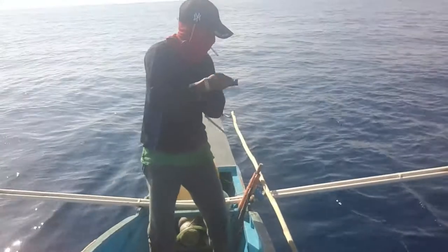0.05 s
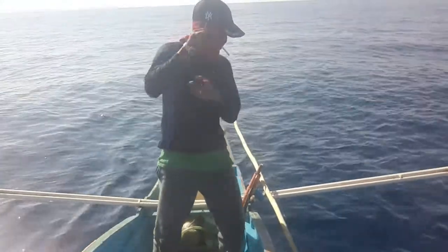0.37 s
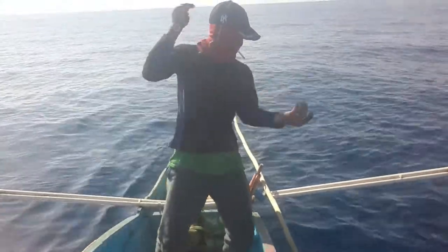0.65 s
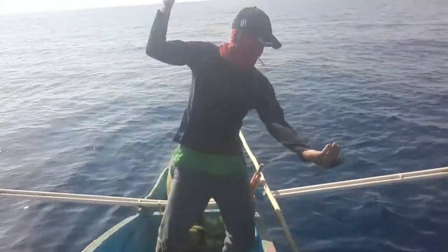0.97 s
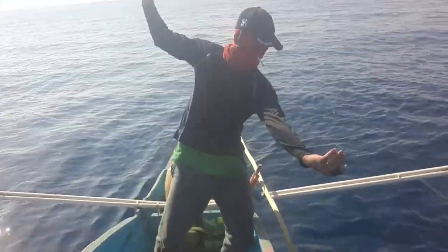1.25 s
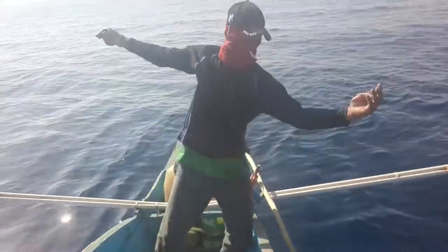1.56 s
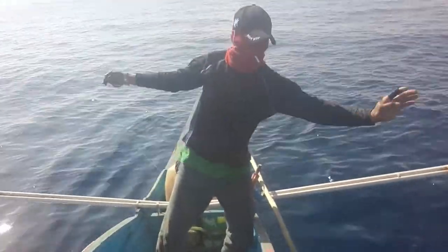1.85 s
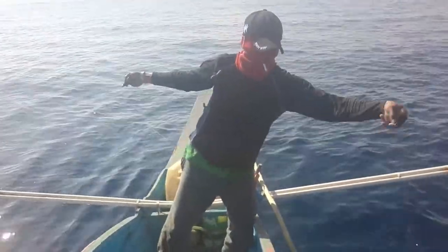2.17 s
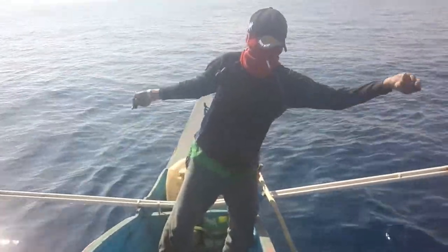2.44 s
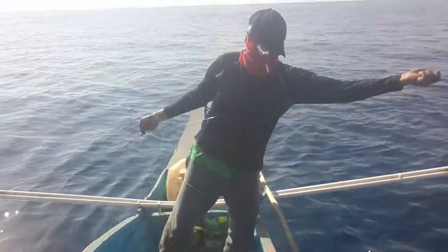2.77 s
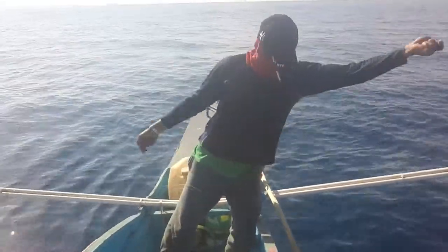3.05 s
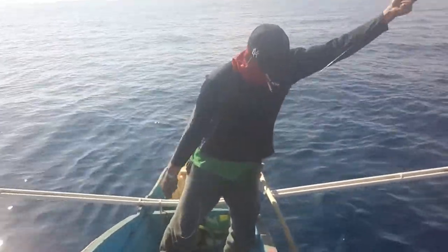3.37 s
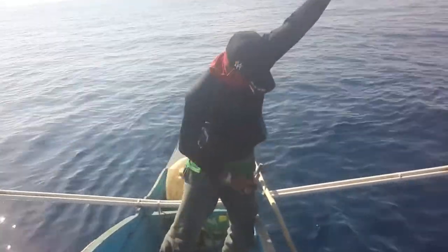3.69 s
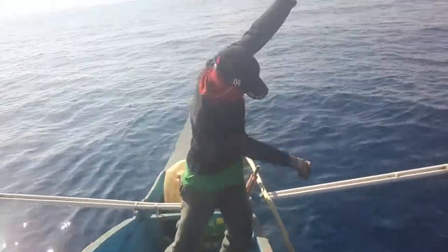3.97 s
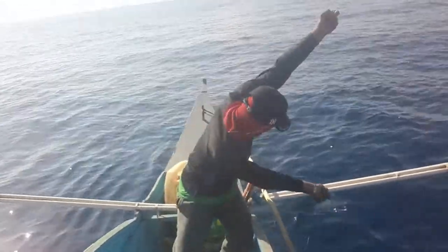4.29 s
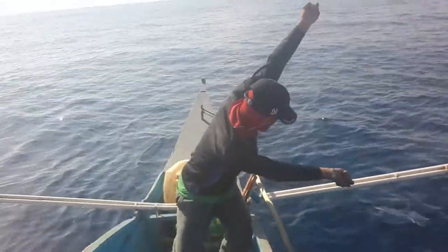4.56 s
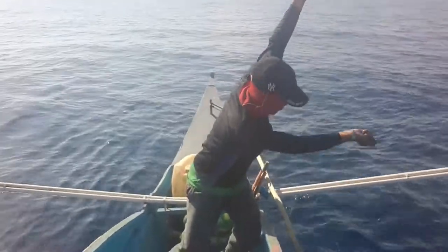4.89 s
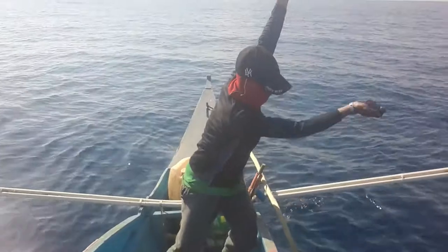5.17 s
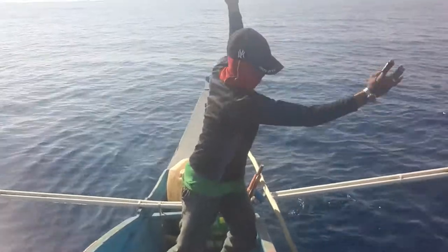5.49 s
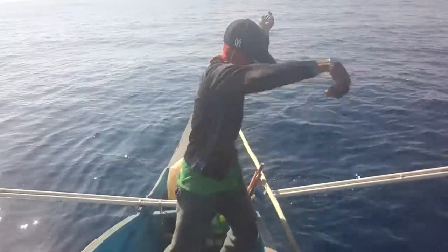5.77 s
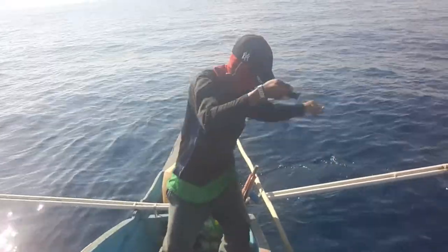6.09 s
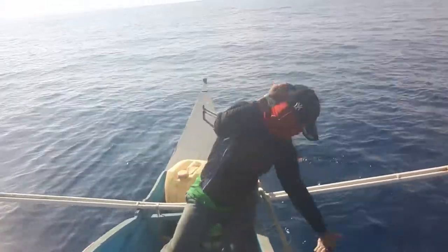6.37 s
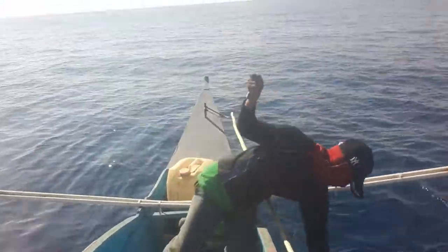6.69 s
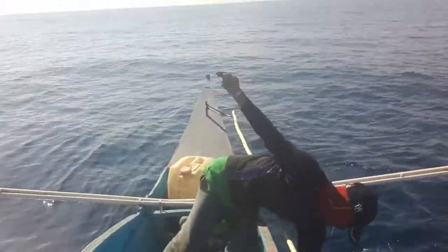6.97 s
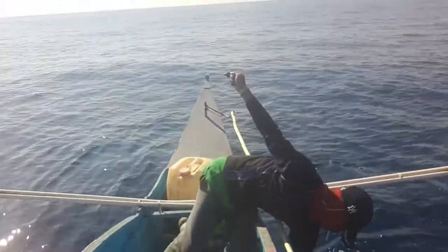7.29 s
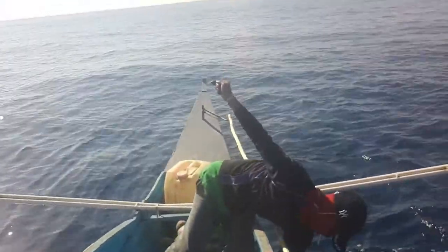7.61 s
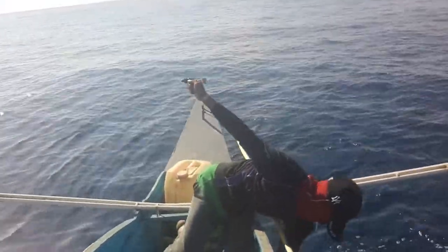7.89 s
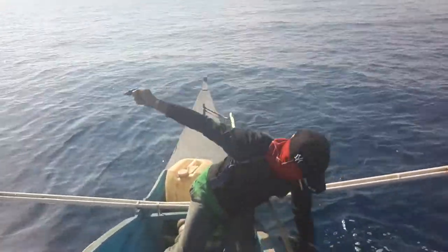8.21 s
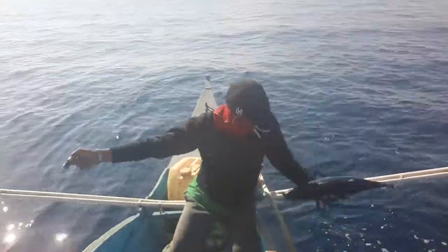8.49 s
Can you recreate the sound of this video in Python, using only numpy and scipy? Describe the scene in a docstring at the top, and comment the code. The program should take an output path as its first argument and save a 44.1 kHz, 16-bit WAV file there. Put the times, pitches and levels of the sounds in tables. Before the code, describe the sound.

Quiet water laps around a small outrigger boat while the hollow hull knocks dully under a fisherman's shifting weight. A fishing line faintly ticks and rasps through his hands, and a joint creaks in jerks. Past the middle, the water splashes and gurgles loudly as the catch comes up, followed by heavy thumps on the boards, more creaks and a last short splash. The microphone is close, mounted on the hull.

```python
"""The hollow hull of a small outrigger knocks, booms and creaks as a fisherman hauls a handline. His shifting
weight rings hull and floor boards; loaded joints slip in jerks; waves thump the planks. The line ticks through
his hands. Over a calm sea, water laps, then splashes and gurgles as the catch comes up: ringing bubbles, churn
and spray. Water, line and the grit of rasping joints reach a hull-mounted microphone through two air ports, the
rest of the boat's sounds through the mount."""
import sys
import numpy as np
from scipy import signal
from scipy.fft import rfft, irfft, next_fast_len
from scipy.io import wavfile
from scipy.ndimage import uniform_filter1d, minimum_filter1d, map_coordinates

SR = 44100
rng = np.random.default_rng(int(sys.argv[2]) if len(sys.argv) > 2 else 0)


def transcribe(signal):
    """Save signal, clipped to [-1, 1], as a 16-bit WAV file at the path in sys.argv[1]."""
    frames = np.atleast_2d(signal).T
    limited = np.clip(frames, -1, 1)
    pcm = np.round(limited * 32767).astype(np.int16)
    wavfile.write(sys.argv[1], SR, pcm)


N = 381112

# Spectral outlines: f/Hz, relative density/dB
SEA_SPECTRUM = [(35, -35.5), (62, -8.5), (115, 10.5), (180, -5), (380, -13), (900, -11.5), (2500, -54),
                (15000, -54.5)]
FRICTION_SPECTRUM = [(80, -21), (700, 15), (2300, -3.5), (3500, -8.5), (6500, -15), (9000, -25),
                     (15000, -40.5)]
TICK_SPECTRUM = [(300, -19), (1000, 16), (1900, -2.5), (2900, 3.5), (4500, -4.5), (7000, -6.5),
                 (11000, -34.5), (15000, -26.5)]
SPLASH_SPECTRUM = [(150, -22.5), (500, 1), (800, 7.5), (1500, 1), (3200, -19.5), (5000, -45.5),
                   (15000, -49.5)]
SPRAY_SPECTRUM = [(800, -7), (2400, -4), (4300, -6.5), (6700, -8.5), (8300, -27.5), (15000, -31.5)]
CLACK_SPECTRUM = [(150, -12), (550, 5.5), (1400, -4.5), (2300, -15.5), (6000, -72)]
THUMP_SPECTRUM = [(60, -21), (190, 0.5), (310, 6.5), (490, 3), (780, -25.5), (4000, -82)]
# Hull and floor board modes: f/Hz, level/dB, t60/s
HULL_MODES = [(124.4, -20, 0.18), (199, -11.5, 0.048), (312.5, -2, 0.27), (342.7, 12.5, 0.1),
              (384.2, -0.5, 0.18), (487.6, -7.5, 0.1)]
BOARD_MODES = [(70.6, -3.5, 0.48), (95.5, -1, 0.24), (116.6, -5.5, 0.37), (182, -8, 0.25)]
# Joint resonances: f/Hz, level/dB, left minus right/dB
JOINT_MODES = [(810, 1, 0), (1397, 14, -14), (2220, 9.5, -17), (3690, -7, 7), (5030, -5.5, 22)]
# Microphone ports: f/Hz, left gain/dB, right gain/dB, left phase lead/rad
PORT_RESPONSE = [(101, 0.5, 1.5, 0), (380, 6, 12.5, -0.5), (530, -1.5, 0.5, -0.5), (920, 0.5, 0.5, 0.94),
                 (1120, 1, 4.5, -1.5), (1904, 1, 9, -1.5), (2430, 14, 11, 2), (3230, 7, 1, 5.5),
                 (3944, 12.5, -16, -1.5), (4280, -2.5, -3.5, 0.5), (6520, 9.5, -12.5, 3.5),
                 (8600, -9.5, 9, 10), (14000, 5, -9.5, 6.5)]

# Event levels are relative within each table.
# Arm sweeps: middle t/s, length/s, level/dB, centre f/Hz
ARM_SWEEPS = [(0.79, 0.81, -61.5, 1800)]
# Gritty rasps of loaded joints sticking and slipping: middle t/s, length/s, level/dB
CREAK_RASPS = [(0.165, 0.17, -44), (1.188, 0.06, -40.5), (3.8, 0.079, -40), (4.01, 0.4, -42),
               (4.785, 0.091, -35), (7.54, 0.22, -37.5), (8.21, 0.21, -38)]
# Line ticks and spits of spray: t/s, level/dB
SNAPS = [(0.169, -36.5), (1.15, -44.5), (1.164, -32), (1.2284, -38), (2.3556, -43), (2.424, -38),
         (2.4786, -42), (4.005, -28), (4.7617, -27.5), (5.699, -18), (5.903, -24.5), (5.9434, -26),
         (5.971, -24), (7.4832, -30), (7.5707, -32.5)]
# Surges, from laps to the thrashing catch; the row at 3.8 s is a soft scuffing swell under the creaks: start
# t/s, rise/s, length/s, level/dB
WATER_SURGES = [(0, 0.02, 0.97, -48), (1.15, 0.025, 0.54, -45.5), (2.2, 0.03, 0.76, -49),
                (3.8, 0.024, 0.66, -45.5), (4.63, 0.017, 0.66, -42), (5.23, 0.16, 0.28, -28),
                (5.53, .06, .15, -28), (5.64, 0.04, 0.47, -25), (6.22, 0.0077, 0.26, -26.5),
                (6.55, 0.09, .28, -33.5), (7.35, 0.11, 0.46, -32.5), (8.21, .045, 0.12, -28),
                (8.4, 0.12, 0.26, -42)]
# Spray thrown by the catch: middle t/s, length/s, level/dB
SPRAY_SHEETS = [(5.41, 0.09, -41), (5.96, 0.06, -33.5), (8.295, 0.16, -37)]
# Gliding air pockets: start t/s, length/s, level/dB, start f/Hz, end f/Hz
POCKET_GULPS = [(1.586, 0.035, -35, 862, 920), (5.361, .11, -24, 1450, 471.7)]
# Water slaps: t/s, level/dB, bubble f/Hz
WATER_PLOPS = [(2.21, -22, 1067), (2.623, -24, 712), (5.381, -17.5, 1380), (5.419, -6.5, 664),
               (5.495, -17, 710), (5.68, -9.5, 990), (5.728, -16, 1600), (5.809, -11, 690),
               (5.902, -13, 610), (5.951, -5.5, 832), (6.173, -19, 1560), (6.224, -13, 923),
               (6.345, -7, 900), (6.423, -11, 1006), (6.587, -20, 1060), (6.641, -21.5, 1960),
               (6.685, -19.5, 1034), (6.816, -14.5, 1904), (6.935, -20.5, 1386), (7.367, -18.5, 702),
               (7.671, -13, 746), (7.962, -22, 1570), (8.257, -17, 1020), (8.465, -24.5, 800),
               (8.504, -24, 863)]
# Weight shifts loading the hull: start t/s, length/s, level/dB
WEIGHT_SHIFTS = [(0.404, 1.31, -41), (2.195, 0.66, -40), (2.641, 0.073, -28.5), (3.85, 0.42, -32),
                 (4.64, 0.3, -28), (5.664, 0.46, -29), (6.283, 0.25, -24), (6.604, 0.15, -31),
                 (7.502, 0.34, -28.5), (8.18, 0.16, -31.5)]
# Joint slips: t/s, level/dB
JOINT_SLIPS = [(1.3742, -28.5), (1.4257, -24), (2.842, -33.5), (2.868, -37.5), (2.889, -33), (3.837, -20.5),
               (3.876, -24), (3.9101, -22.5), (3.954, -22.5), (4.0163, -16.5), (4.067, -19.5),
               (4.1497, -19.5), (7.5995, -23), (7.638, -22), (7.668, -22), (7.6983, -22), (7.7339, -18.5),
               (7.8235, -17.5), (8.1273, -28), (8.161, -25)]
# Waves hitting the planks: t/s, level/dB
WAVE_HITS = [(2.214, -9.5), (5.42, -17.5), (5.809, -9), (7.366, -13.5)]
# Heavy steps on the boards: t/s, level/dB
FOOTFALLS = [(.703, -15.5), (0.739, -18), (2.213, -24), (6.349, -8.5), (6.386, -10.5)]
# Blows on the hull: t/s, level/dB, blow f/Hz
HULL_BLOWS = [(0.189, -26.5, 318), (0.534, -19.5, 282), (1.029, -24.5, 290), (2.216, -13, 274),
              (2.639, -8, 390), (3.499, -30.5, 403), (4.213, -22, 410), (4.299, -21, 440),
              (4.812, -13, 320), (4.852, -17, 305), (4.912, -15, 320), (5.677, -15.5, 334),
              (5.807, -13, 320), (5.949, -11, 336), (6.312, -6.5, 355), (6.442, -6.5, 298),
              (6.738, -15.5, 333), (7.368, -4, 289)]

SURGE_T60_S, AFTERWASH_T60_S, AFTERWASH_DB, LAPPING_DB = 0.47, 3.5, -9, -59.5
LOAD_RISE_S, LOAD_T60_S, WATER_TO_HULL_DB, ROCKING_DB = 0.027, 0.44, -5, -50.5


def undb(db):
    """Decibels to gain."""
    return 10 ** (np.asarray(db) / 20)


def unit(x):
    """Scale to rms 1."""
    return x / np.sqrt(np.mean(x ** 2))


def peak(x):
    """Scale to peak 1."""
    return x / np.abs(x).max()


def clock(length_s):
    """Sample times in s."""
    return np.arange(int(length_s * SR)) / SR


def add(track, start_s, sound):
    """Mix a sound into a track."""
    i = max(int(start_s * SR), 0)
    track[..., i:i + sound.shape[-1]] += sound[..., :max(N - i, 0)]


def pan(left_minus_right_db):
    """Left and right gains, mean 1."""
    gains = undb([[left_minus_right_db / 2], [-left_minus_right_db / 2]])
    return gains / gains.mean()


def on_bins(table, n):
    """Columns of a frequency table on the bins of an n-point FFT."""
    hz, *columns = np.transpose(table)
    log_bins = np.log(np.arange(n // 2 + 1) * SR / n + 1)
    return [np.interp(log_bins, np.log(hz), column) for column in columns]


def colour(x, spectrum):
    """Minimum-phase filter from a spectral outline."""
    n = 2 * next_fast_len(x.shape[-1] // 2 + 1024)
    cepstrum = irfft(np.log(undb(on_bins(spectrum, n)[0])))
    cepstrum[1:n // 2] *= 2
    cepstrum[n // 2 + 1:] = 0
    return irfft(rfft(x, n) * np.exp(rfft(cepstrum)))[..., :x.shape[-1]]


def fade(t, t60_s):
    """Exponential decay."""
    return np.exp(-np.log(1000) * t / t60_s)


def burst(t, spectrum, t60_s, stereo=False):
    """Decaying coloured noise, peak 1."""
    noise = rng.standard_normal((2, len(t)) if stereo else len(t))
    return peak(colour(noise * fade(t, t60_s), spectrum))


def ring(modes, t, detune=0.):
    """Sum of damped modes with optional random detuning."""
    out = np.zeros(len(t))
    for hz, db, t60_s in modes:
        hz *= 1 + detune * rng.standard_normal()
        out += undb(db) * fade(t, t60_s) * np.sin(2 * np.pi * hz * t)
    return out


def wander(rate_hz):
    """Gaussian values joined by ramps."""
    return np.interp(np.arange(N) / SR * rate_hz, np.arange(4096), rng.standard_normal(4096))


def patter(rate_hz, spread_db):
    """Random impulses of uneven size."""
    hits = rng.random(N) < rate_hz / SR
    return hits * rng.choice([-1, 1], N) * undb(spread_db * rng.standard_normal(N))


def centred_noise():
    """Stereo noise, nearly alike on both sides."""
    return rng.standard_normal(N) + .35 * rng.standard_normal((2, N))


def swells(events):
    """Gain with one Hann swell per event."""
    gain = np.zeros(N)
    for middle_s, length_s, db in events:
        add(gain, middle_s - length_s / 2, undb(db) * np.hanning(int(length_s * SR)))
    return gain


def envelope(events, t60_s):
    """Gain that rises, holds and decays per event; overlaps add in power."""
    power, t = np.zeros(N), np.arange(N) / SR
    for start_s, rise_s, length_s, db in events:
        rise = np.clip((t - start_s) / rise_s, 0, 1) ** 2
        decay = fade(np.maximum(t - start_s - length_s, 0), t60_s)
        power += (undb(db) * rise * decay) ** 2
    return np.sqrt(power)


def sea(level_db=-42):
    """Low, restless wash of the open sea."""
    wash = centred_noise() * undb(wander(rate_hz=3) + 2 * wander(rate_hz=20))
    return undb(level_db) * unit(colour(wash, SEA_SPECTRUM))


def swishes(sigma_octaves=0.16):
    """Line and sleeve rub as the arms sweep: a swell of narrow hiss."""
    out = np.zeros(N)
    octaves = np.log2(np.arange(N // 2 + 1) * SR / N + 1)
    for middle_s, length_s, db, hz in ARM_SWEEPS:
        band = np.exp(-.5 * ((octaves - np.log2(hz)) / sigma_octaves) ** 2)
        hiss = unit(irfft(rfft(rng.standard_normal(N)) * band, N))
        out += swells([(middle_s, length_s, db)]) * hiss
    return out


def rasps():
    """A loaded joint sticks and slips in quick, uneven runs of grit."""
    impulses = np.abs(patter(rate_hz=220, spread_db=3))
    slips = signal.fftconvolve(impulses, fade(clock(.03), t60_s=.011))[:N]
    return swells(CREAK_RASPS) * unit(colour(slips * rng.standard_normal(N), FRICTION_SPECTRUM))


def ticks():
    """Line and spits of spray make short, bright snaps."""
    out, t = np.zeros(N), clock(.1)
    for start_s, db in SNAPS:
        add(out, start_s, undb(db + 7.5) * burst(t, TICK_SPECTRUM, t60_s=.028))
    return out


def bubble(hz, cycles, glide):
    """A bubble swells within a cycle, then rings down with gliding pitch."""
    life_s = cycles / hz
    t = clock(life_s)
    onset = 1 - np.exp(-2 * hz * t)
    phase = 2 * np.pi * hz * t * (1 + glide * t / life_s / 2)
    return onset * fade(t, life_s) * np.sin(phase)


def water_level_db():
    """Agitation of the water: surges and their afterwash over quiet lapping."""
    surges = envelope(WATER_SURGES, SURGE_T60_S)
    afterwash = undb(AFTERWASH_DB) * envelope(WATER_SURGES, AFTERWASH_T60_S)
    return 10 * np.log10(surges ** 2 + afterwash ** 2 + undb(LAPPING_DB) ** 2)


def water(level_db, max_bubbles=11000):
    """Calm water gurgles in single bubbles; stirring adds more bubbles, churn and spray."""
    stir = np.clip((level_db + 60) / 34, .05, 1)
    bubbles = np.zeros((2, N))
    for when, pitch, life, strength, side, threshold in rng.random((max_bubbles, 6)):
        stirred = stir[int(when * N)]
        if stirred ** 3 > threshold:
            hz = 400 * 2 ** (pitch * (3 - .5 * stirred))
            # Most pockets collapse at once; a few close cleanly and ring.
            tone = bubble(hz, cycles=9 + 40 * life ** 2, glide=.3 * rng.standard_normal())
            gain = np.sqrt(hz) * stirred ** -.6 * undb(12 * strength ** 3)
            add(bubbles, when * N / SR, gain * tone * pan(10 * (side - .5)))
    churn = centred_noise() * undb(3.5 * wander(rate_hz=50))
    body = unit(colour(bubbles, SPLASH_SPECTRUM))
    body += undb(-3) * stir * unit(colour(churn, SPLASH_SPECTRUM))
    shared, left, right = (patter(rate_hz=5000, spread_db=4) for _ in range(3))
    drops = (shared + np.array([left, right])) * undb(3.5 * wander(rate_hz=90))
    spray_gain = undb(1.35 * level_db - 7.5) + swells(SPRAY_SHEETS)
    return undb(level_db - 5) * body + spray_gain * unit(colour(drops, SPRAY_SPECTRUM))


def gulps():
    """Water rattles an air pocket whose pitch slides as it shrinks or opens."""
    out = np.zeros(N)
    for start_s, length_s, db, start_hz, end_hz in POCKET_GULPS:
        t = clock(length_s)
        rattle = signal.fftconvolve(rng.standard_normal(len(t)), t * fade(t, t60_s=.015))[:len(t)]
        hz = np.geomspace(start_hz, end_hz, len(t))
        tone = np.sin(2 * np.pi * np.cumsum(hz) / SR)
        add(out, start_s, undb(db) * unit(rattle * tone) * np.hanning(len(t)))
    return out


def plops():
    """Water slaps shut over an air pocket, which rings."""
    out, t = np.zeros(N), clock(.1)
    for start_s, db, hz in WATER_PLOPS:
        add(out, start_s, undb(db - 5) * burst(t, CLACK_SPECTRUM, t60_s=.059))
        add(out, start_s, undb(db + 2.5) * bubble(hz, cycles=23, glide=.076))
    return out


def ports(air):
    """Airborne sound enters two small ports, each with its own resonances and delay."""
    n = 2 * next_fast_len(N // 2 + 2048)
    left_db, right_db, lead_rad = on_bins(PORT_RESPONSE, n)
    response = undb([left_db, right_db]) * np.exp(.5j * np.array([lead_rad, -lead_rad]))
    return irfft(rfft(air, n) * response)[:, :N]


def hull_strain_db(water_db):
    """Load on the hull from feet, water and its own rocking."""
    loads = [(start_s, LOAD_RISE_S, length_s, db) for start_s, length_s, db in WEIGHT_SHIFTS]
    feet = envelope(loads, LOAD_T60_S)
    return 10 * np.log10(feet ** 2 + undb(water_db + WATER_TO_HULL_DB) ** 2 + undb(ROCKING_DB) ** 2)


def hull_rumble(strain_db):
    """Small bumps and scuffs keep hull and boards ringing."""
    bumps = patter(rate_hz=400, spread_db=3) * undb(3.26 * wander(rate_hz=25))
    hollow = unit(signal.fftconvolve(bumps, ring(HULL_MODES, clock(.2)))[:N])
    # Pitch shifts as water climbs and leaves the planks.
    pitch_ratio = 1 + .06 * wander(rate_hz=20)
    hollow = map_coordinates(hollow, [np.cumsum(pitch_ratio)], mode="mirror")
    boards = unit(signal.fftconvolve(rng.standard_normal(N), ring(BOARD_MODES, clock(.74)))[:N])
    # Heavy boards follow the strain less than the thin sides.
    return undb(strain_db + 3.5) * hollow * pan(-12.5) + undb(.5 * strain_db - 35.5) * boards * pan(-1)


def creaks(joint_t60_s=.008, lowpass_hz=6200):
    """A loaded joint slips in jerks; each gritty burst rings the joint and nudges the hull."""
    out, t = np.zeros((2, N)), clock(.18)
    for start_s, db in JOINT_SLIPS:
        crack = burst(t, FRICTION_SPECTRUM, t60_s=.04, stereo=True)
        modes = sum(ring([(hz, mode_db, joint_t60_s)], t, detune=.06) * pan(side_db)
                    for hz, mode_db, side_db in JOINT_MODES)
        grit = rng.standard_normal((1, len(t))) * t * fade(t, t60_s=.009)
        joint = peak(signal.fftconvolve(modes, grit)[:, :len(t)])
        hull = peak(ring(HULL_MODES, t)) * pan(-21)
        add(out, start_s, undb(db + 5.5) * joint + undb(db - 1) * crack + undb(db - 2.5) * hull)
    return signal.sosfilt(signal.butter(2, lowpass_hz, fs=SR, output="sos"), out)


def judder(start_s=4.669, length_s=.15, level_db=-16.5, first_gap_s=.013, last_gap_s=.0085):
    """The joint gives way in quickening slips: a buzzing creak that builds and fades."""
    out, t, elapsed_s = np.zeros((2, N)), clock(.05), 0.
    while elapsed_s < length_s:
        progress = elapsed_s / length_s
        crack = burst(t, FRICTION_SPECTRUM, t60_s=.025, stereo=True)
        swell_db = -8 * (2 * progress - 1) ** 2
        add(out, start_s + elapsed_s, undb(level_db + swell_db + 2 * rng.standard_normal()) * crack)
        elapsed_s += first_gap_s + (last_gap_s - first_gap_s) * np.sqrt(progress)
    return out


def thumps():
    """A wave meets the planks flat: a short, hollow thud."""
    out, t = np.zeros(N), clock(.25)
    for start_s, db in WAVE_HITS:
        add(out, start_s, undb(db) * burst(t, THUMP_SPECTRUM, t60_s=.11))
    return out * pan(-6)


def booms():
    """Weight drops on the boards; a soft sole spreads the push, then damps them."""
    out, t = np.zeros(N), clock(.58)
    for start_s, db in FOOTFALLS:
        sole = (1 - fade(t, t60_s=.067)) * fade(t, t60_s=.33)
        add(out, start_s, undb(db) * peak(ring(BOARD_MODES, t, detune=.026) * sole))
    return out * pan(-4)


def knocks():
    """A soft blow swings a plank briefly and rings the hull, with a dull clack at contact."""
    out, t = np.zeros((2, N)), clock(.22)
    for start_s, db, hz in HULL_BLOWS:
        blow = peak(np.sin(2 * np.pi * hz * t) * t * fade(t, t60_s=.02))
        hollow = peak(signal.fftconvolve(blow, ring(HULL_MODES, t, detune=.02))[:len(t)])
        body = peak(hollow + .5 * blow) * pan(-16.5)
        clack = burst(t, CLACK_SPECTRUM, t60_s=.11) * pan(-12)
        add(out, start_s - .002, undb(db + 4) * body + undb(db - 12) * clack)
    return out


def scene():
    """Water, line and joint rasps through the air, the rest of the boat through the mount."""
    water_db = water_level_db()
    air = water(water_db) + plops() + gulps() + ticks() + rasps() + swishes() + sea()
    boat = knocks() + thumps() + booms() + hull_rumble(hull_strain_db(water_db)) + creaks() + judder()
    return ports(air) + boat


def record(dry):
    """Recorder: high-pass, peak limiter, faint hiss, low-pass."""
    highpass_hz, lowpass_hz, limiter_samples, hiss_db = 46, 15450, 221, -69.5
    lean = signal.sosfilt(signal.butter(4, highpass_hz, "high", fs=SR, output="sos"), dry)
    gain = minimum_filter1d(1 / np.maximum(np.abs(lean), 1), size=limiter_samples)
    limited = lean * uniform_filter1d(gain, size=limiter_samples)
    hiss = undb(hiss_db) * rng.standard_normal((2, N))
    return signal.sosfilt(signal.ellip(10, .2, 70, lowpass_hz, fs=SR, output="sos"), limited + hiss)


dry = scene()
out = record(dry)
transcribe(out)
```